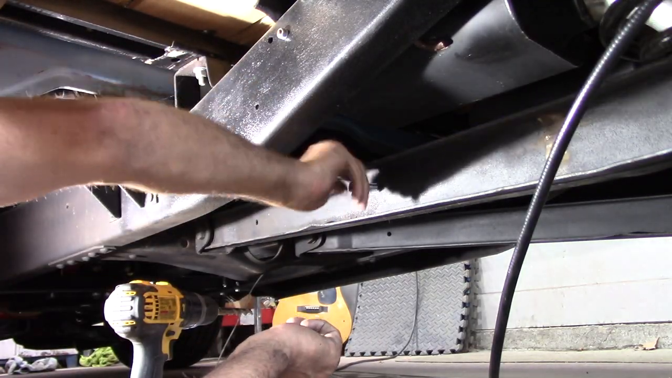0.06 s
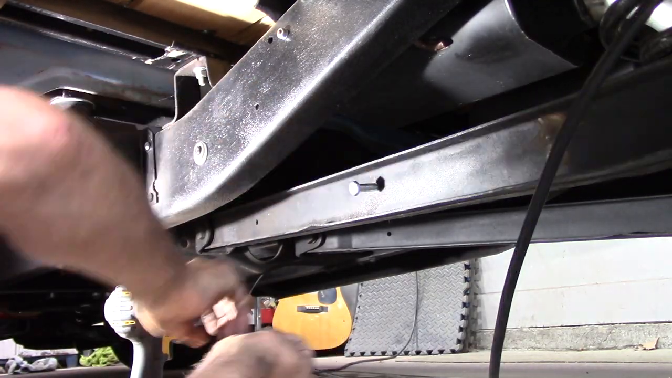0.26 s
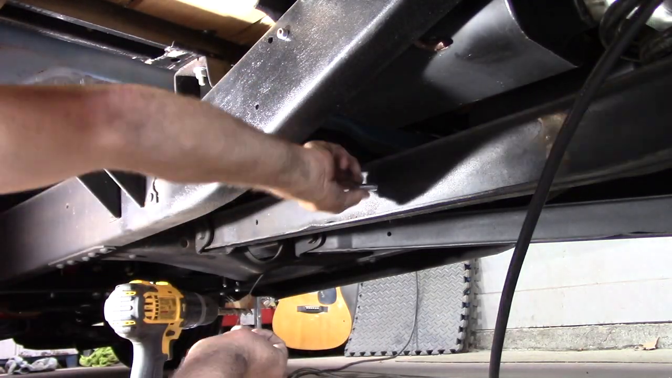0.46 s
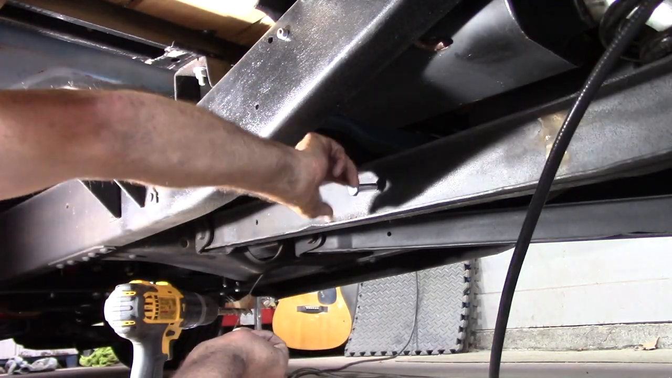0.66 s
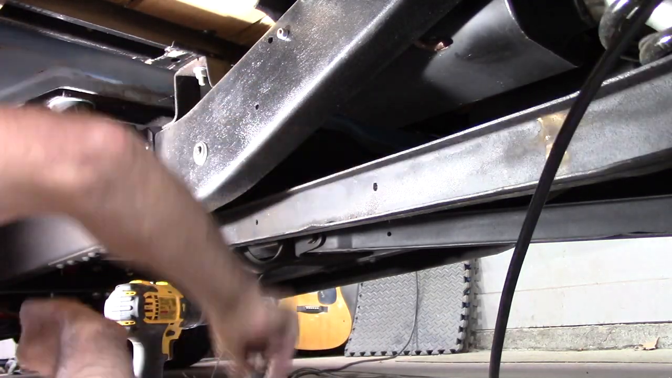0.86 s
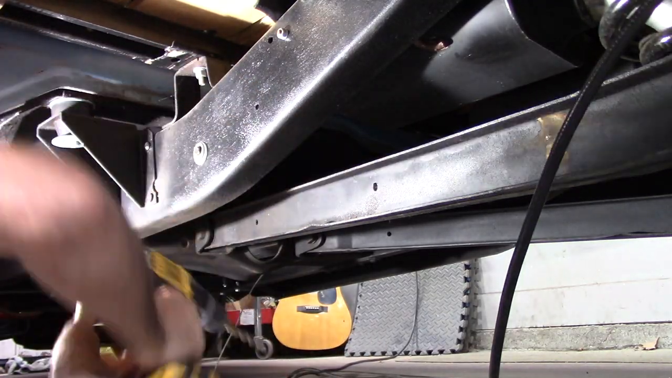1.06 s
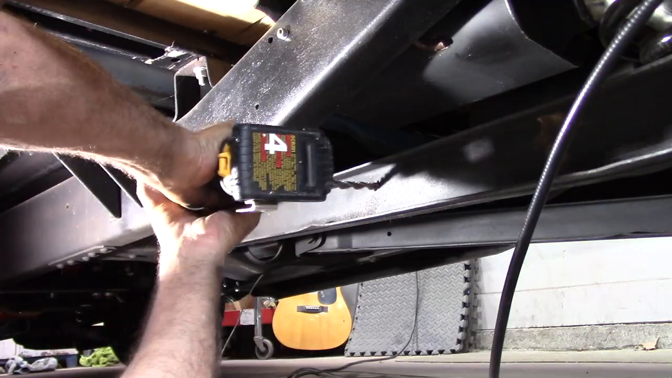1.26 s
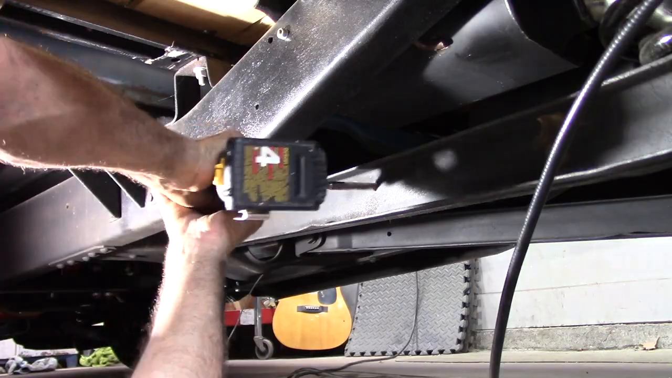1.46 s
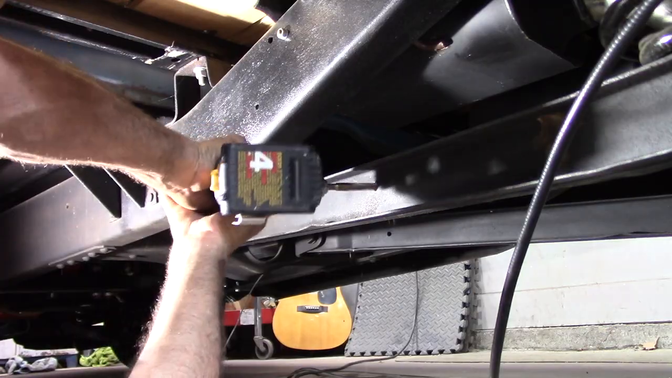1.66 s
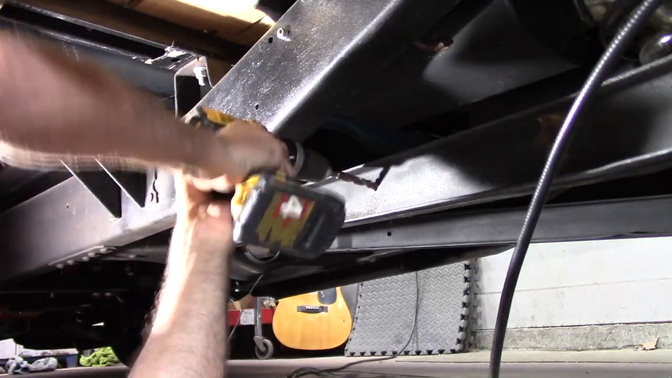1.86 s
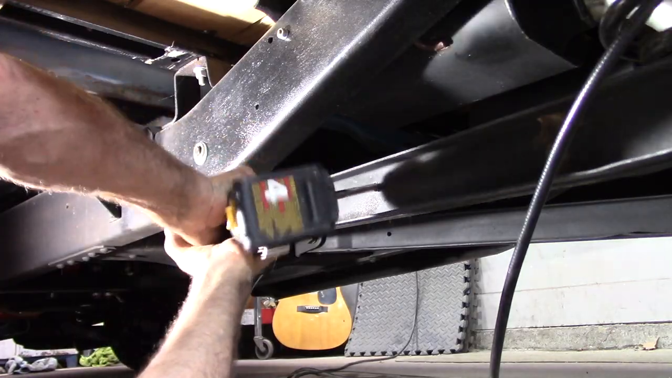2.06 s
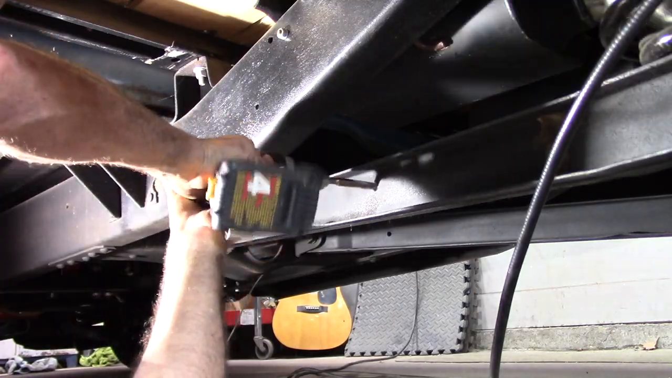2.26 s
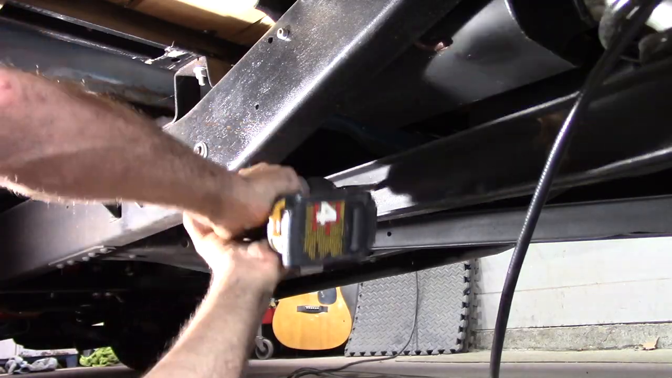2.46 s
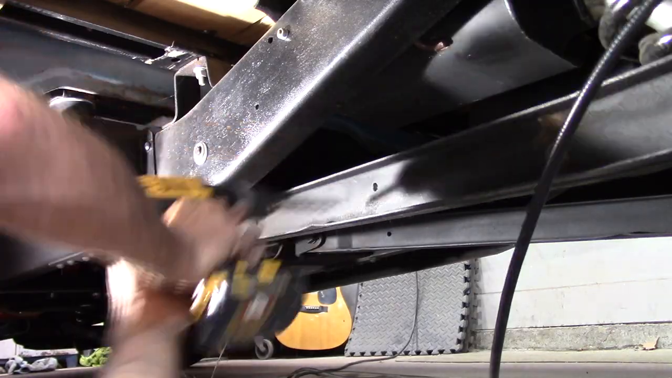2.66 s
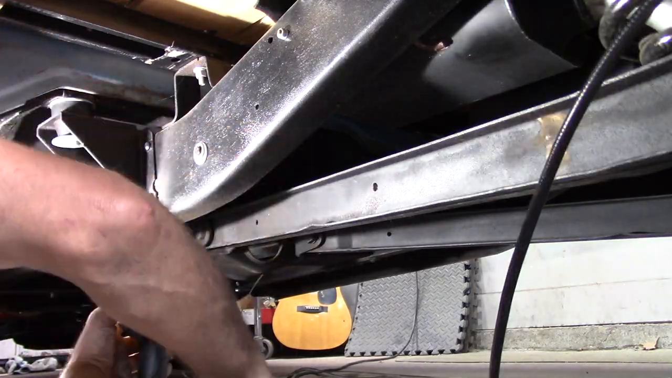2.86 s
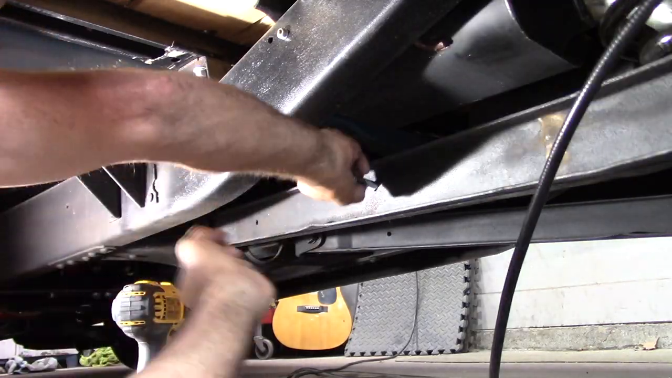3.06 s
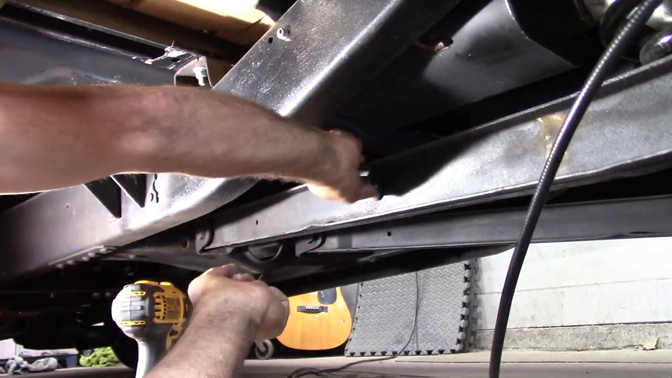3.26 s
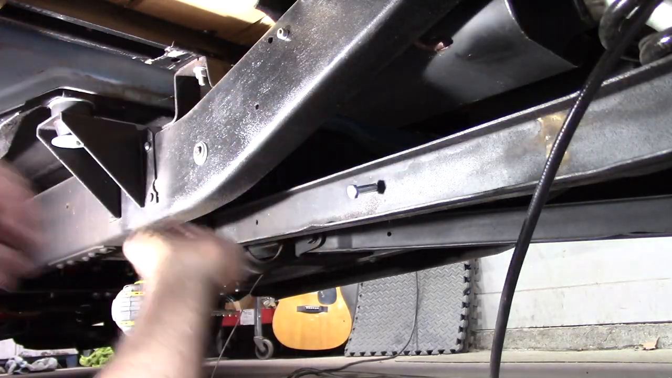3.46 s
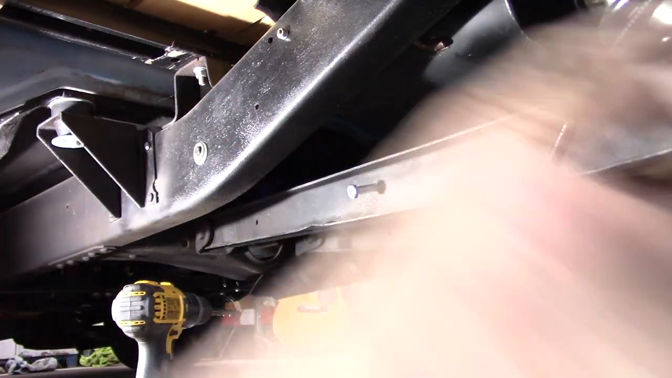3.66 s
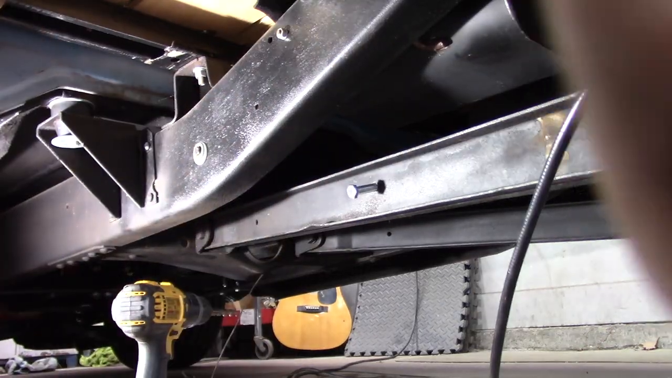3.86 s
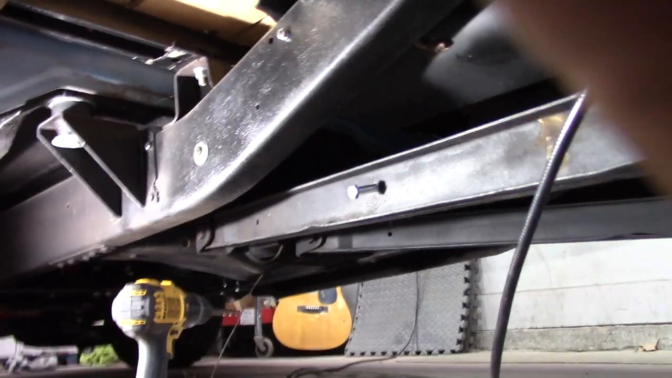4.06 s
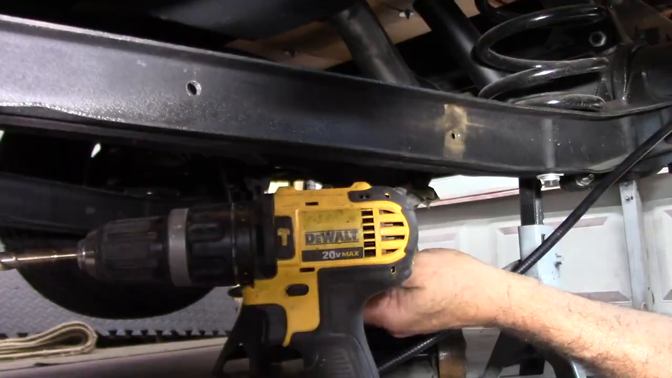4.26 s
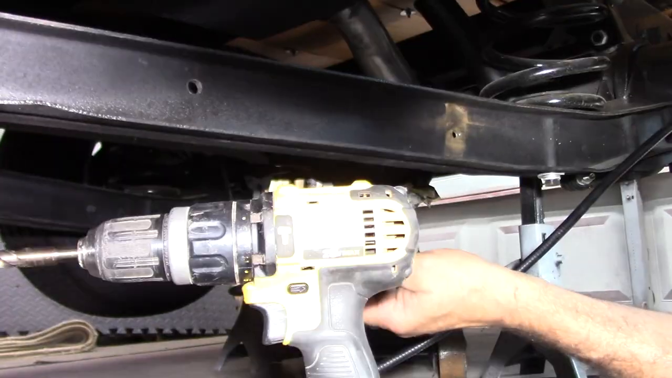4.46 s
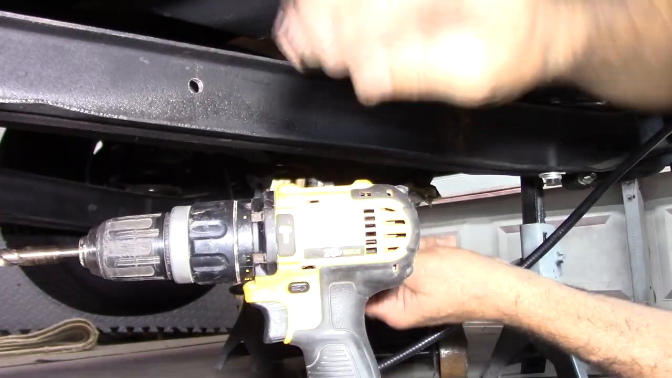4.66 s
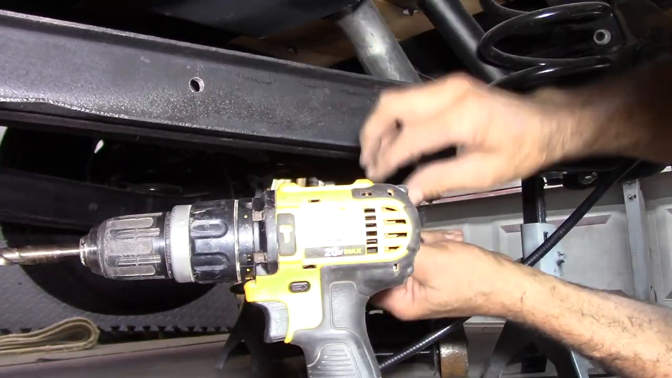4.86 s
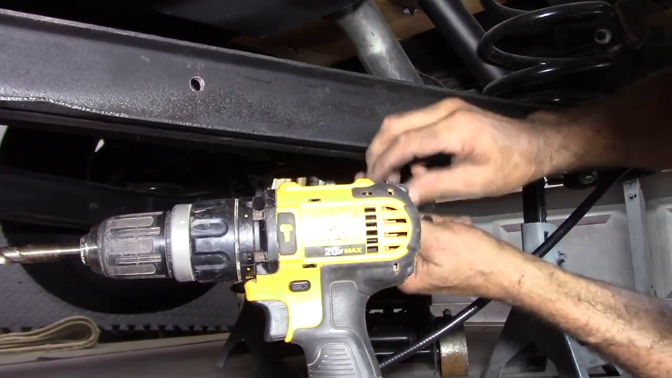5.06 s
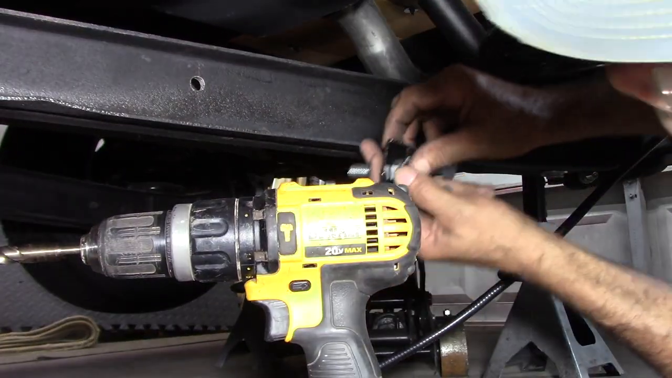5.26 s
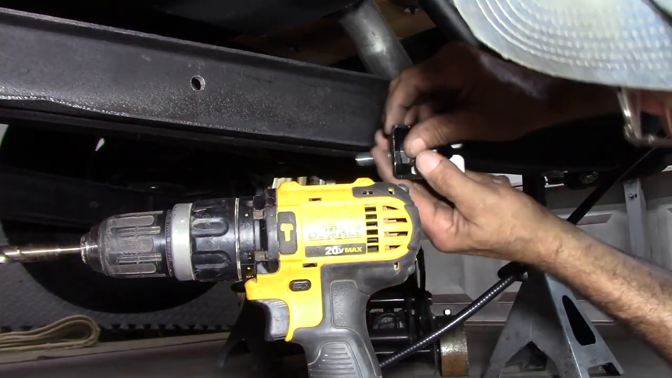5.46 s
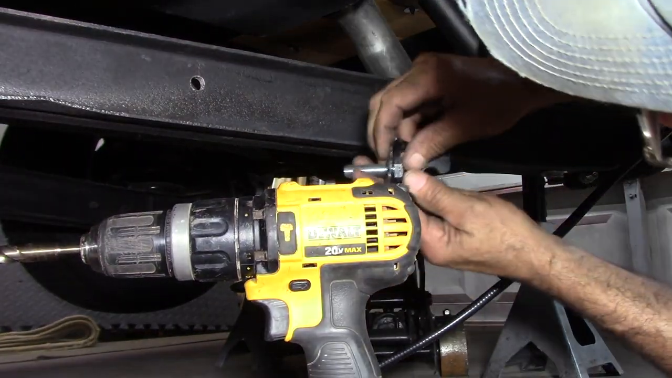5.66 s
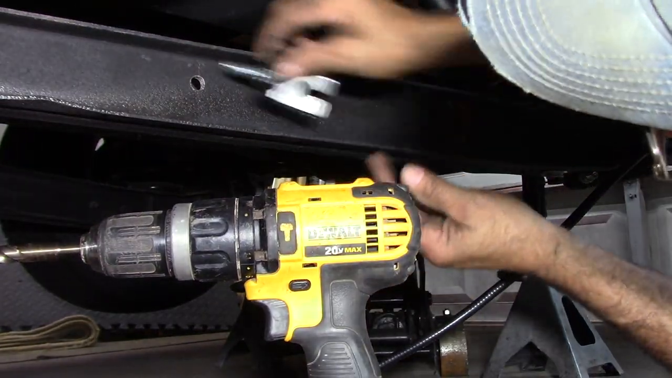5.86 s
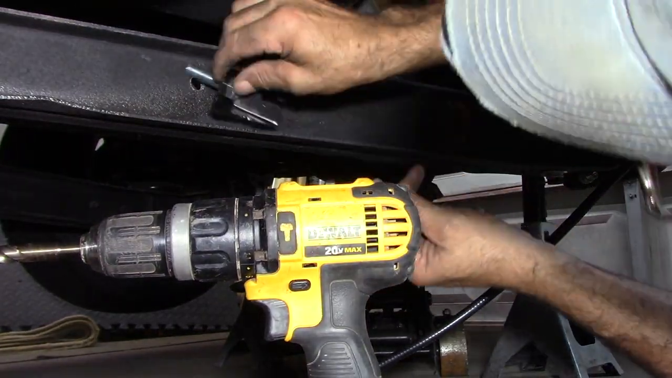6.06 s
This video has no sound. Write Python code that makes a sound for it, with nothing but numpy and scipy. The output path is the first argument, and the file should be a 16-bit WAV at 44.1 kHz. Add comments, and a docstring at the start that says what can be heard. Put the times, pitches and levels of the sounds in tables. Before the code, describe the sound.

In a garage, close and nearly central, fast-motion work on a steel rail: tiny bolt clinks and scrapes over a high fan rush, two drill knocks, then harsh bright drilling in two pushes with a high whine. The bolt rattles back in. At natural speed the fan drops to a low hum, small parts click, and a bracket clanks at the end.

```python
"""A garage, where someone works on a steel frame rail. First in fast motion, so that all is high and brief: a bolt is
tried in its hole, a cordless drill knocks against the rail and bores in two pushes, and the bolt scrapes back in, over
the rush of a fan. Then at natural speed: the fan hums low, small parts click and a steel bracket clanks on the rail.
Cutting, scrapes and air are coloured noise, clear rings are decaying sines, and the motor's whine is a gliding sine."""
import sys
import numpy as np
from scipy import signal
from scipy.fft import rfft, irfft, next_fast_len
from scipy.io import wavfile
from scipy.ndimage import uniform_filter1d, map_coordinates

SR = 44100
rng = np.random.default_rng(int(sys.argv[2]) if len(sys.argv) > 2 else 0)


def wrap_up_sound(samples):
    """Save the sound to the file named by the first command line argument, as 16-bit audio."""
    columns = np.atleast_2d(samples).T
    # keep every value between -1 and 1, then stretch to whole-number steps
    tamed = np.clip(columns, -1, 1)
    steps = np.round(tamed * 32767).astype(np.int16)
    wavfile.write(sys.argv[1], SR, steps)


N = 269892
TIME = np.arange(N) / SR
FAST_UNTIL_S = 4.309  # fast motion gives way to natural speed
TOP_HZ = 15850  # band limit

# The rail's low resonances. Each row: centre in Hz, width in Hz, gain in dB.
RAIL_LOW = [(832, 5.1, 3), (883, 5.4, 6), (990, 25, -14.5), (1178, 27, 1.5), (1410, 37, 2.5),
            (1537, 61, -0.5), (1610, 23, 0), (1780, 27, -1), (2340, 27, -0.5), (2780, 160, 2.5)]
# The rail's high resonances. Each row: centre in Hz, width in Hz, gain in dB.
RAIL_HIGH = [(3576, 300, 4.5), (4790, 33, 7.5), (5040, 30, 2), (5180, 99, 0), (5860, 32, 7),
             (6110, 60, -11), (6410, 110, 4), (6920, 87, 3), (7570, 80, -1), (7590, 100, 0.5),
             (8030, 130, 2), (8750, 150, 2.5), (9470, 130, 6), (9960, 150, 4.5), (10590, 120, 1),
             (11200, 91, 4.5), (11480, 120, -1), (12000, 180, 4), (14270, 120, 0.5), (14900, 160, 6),
             (15400, 150, -13)]
# Colour of a dull contact with the rail. Each row: frequency in Hz, relative level in dB per Hz.
THUD = [(180, -50.5), (300, -26.5), (824, -6), (1400, -7.5), (2080, -13.5), (2760, -13), (3050, -17.5),
        (3970, -14), (4310, -18.5), (4850, -13), (6530, -19), (8370, -24.5), (15700, -27.5)]


def amp(db):
    """Decibels to gain."""
    return 10 ** (np.asarray(db) / 20)


def unit(x):
    """Scale to rms 1."""
    return x / np.sqrt(np.mean(x ** 2) + 1e-20)


def curves(rows):
    """One value per sample for each column after the time."""
    s, *columns = np.transpose(rows)
    return [np.interp(TIME, s, column) for column in columns]


def wobble(rate):
    """A smooth random curve with this many knots a second."""
    knots = rng.standard_normal(int(N * rate / SR) + 4)
    return map_coordinates(knots, [TIME * rate])


def colour(points, hz):
    """Gain of (Hz, dB) points joined on a log frequency axis."""
    f, db = np.transpose(points)
    return amp(np.interp(np.log(hz + 1), np.log(f + 1), db))


def resonance(peaks, hz):
    """Gain of a set of resonances (centre Hz, width Hz, dB), their powers summed."""
    power = 0
    for centre, width, db in peaks:
        damping = (hz * width) ** 2
        power = power + amp(db) ** 2 * damping / ((centre * centre - hz * hz) ** 2 + damping)
    return np.sqrt(power)


def above(edge_hz, hz, order=8):
    """Gain of a high-pass."""
    return np.sqrt(1 - 1 / (1 + (hz / edge_hz) ** order))


def below(edge_hz, hz, order=8):
    """Gain of a low-pass."""
    return np.sqrt(1 / (1 + (hz / edge_hz) ** order))


def filtered(x, response):
    """Shape the spectrum of x by a gain that depends on frequency."""
    n = x.shape[-1]
    padded = next_fast_len(n + 4096)
    spectrum = rfft(x, padded) * response(np.fft.rfftfreq(padded, 1 / SR))
    return irfft(spectrum, padded)[..., :n]


def noise(response, size=N):
    """Coloured noise of rms 1."""
    return unit(filtered(rng.standard_normal(size), response))


def add(track, s, sound):
    """Mix a sound into a track at time s."""
    start = max(round(s * SR), 0)
    track[start:start + len(sound)] += sound[:max(N - start, 0)]


def contact(s, db, response, rise, t60):
    """A crowd of dense resonances swells to a crest at time s, then dies away, the treble faster."""
    start = max(round(s * SR) - SR // 8, 0)
    t = TIME[start:start + SR // 2] - s

    def shape(life):
        return np.exp(np.minimum(t, 0) / abs(rise) - np.log(1000) * np.maximum(t, 0) / life)

    crowd = noise(response, size=len(t))
    treble = filtered(crowd, lambda hz: above(7200, hz))
    track = np.zeros(N)
    add(track, start / SR, amp(db) * (shape(t60) * (crowd - treble) + shape(0.61 * t60) * treble))
    return track


def ring(s, db, modes):
    """Clear modes (Hz, dB, t60 s) struck at time s, at new strengths for each blow."""
    t = TIME[:SR // 2]
    hz, level_db, t60 = np.transpose(modes)[:, :, None]
    gain = amp(level_db + rng.normal(0, 1, level_db.shape))
    sines = np.sin(2 * np.pi * (hz * t + rng.random(hz.shape)))
    waves = gain * sines * np.exp(-np.log(1000) * t / t60)
    onset = 1 - np.exp(-t / 0.00059)
    track = np.zeros(N)
    add(track, s, amp(db) * onset * waves.sum(0) / np.linalg.norm(gain))
    return track


def tones(lines, drift):
    """Steady lines (Hz, rms dB) whose pitch wanders slightly."""
    total = 0
    for hz, db in lines:
        phase = 2 * np.pi * hz * np.cumsum(1 + drift * wobble(25)) / SR
        total = total + amp(db) * np.sqrt(2) * np.sin(phase)
    return total


def patchy(x, depth_db):
    """Resonances come and go as the tool shifts: a smooth random gain over frequency and time."""
    z = signal.stft(x, nperseg=1024)[2]
    field = rng.standard_normal(z.shape)
    for _ in range(2):
        field = uniform_filter1d(field, size=3, axis=0)
        field = uniform_filter1d(field, size=4, axis=1)
    return signal.istft(z * amp(depth_db * unit(field)), nperseg=1024)[1][:N]


def drill():
    """The flutes tear off chips and every fracture excites the rail; depth of cut drives all but the motor."""
    # How hard the bit cuts in the first push. Each row: time in seconds, cut in dB.
    first_push = [(1.41, -47), (1.436, -20), (1.45, -15), (1.792, -12), (1.82, -19.5), (1.856, -11.5),
                  (1.88, -16.5), (1.904, -34), (1.92, -29)]
    # How hard it cuts in the second push. Each row: time in seconds, cut in dB.
    second_push = [(1.92, -28), (1.928, -36), (1.972, -14), (2.058, -12.5), (2.156, -19), (2.17, -12),
                   (2.2, -18.5), (2.29, -11), (2.416, -13.5), (2.45, -9.5), (2.486, -18.5), (2.504, -13.5),
                   (2.578, -12.5), (2.618, -21.5), (2.67, -15.5), (2.7, -22.5), (2.716, -17.5),
                   (2.755, -40)]
    # Colour of the cutting noise. Each row: frequency in Hz, relative level in dB per Hz.
    cutting = [(150, -67), (250, -40), (347, -2), (458, -33.5), (536, -8), (683, -3), (855, -9),
               (982, -7.5), (1540, -16.5), (2180, -12), (3600, -12.5), (5090, -7), (7580, -11),
               (11300, -2.5), (15700, -6)]
    full_cut_db = -11.5  # a firm, steady cut
    stop_s, run_down_s = 2.77, 0.049  # the drill dies away just before it stops
    groan_start_db, groan_follows, groan_fade_db_per_s = -23, .25, 4  # less groan as the hole deepens
    # the rail booms once the bit is in, and fades as the motor slows; pressing harder damps it
    boom_from_s, boom_until_s = 1.66, 2.72
    boom_start_db, boom_damped, boom_fade_db_per_s = -30.5, 0.28, 4

    rows = np.vstack([first_push, second_push])
    cut_db, = curves(rows)
    start_s = rows[0, 0]
    load_db = cut_db - full_cut_db
    running = np.clip((TIME - start_s) * 100, 0, 1) * np.clip((stop_s - TIME) / run_down_s, 0, 1)

    grip = amp(0.77 * wobble(55) + 0.91 * wobble(260))  # the edge grabs and slips
    chips = patchy(rng.standard_normal(N), depth_db=2.0) * grip * amp(2 * rng.standard_normal(N))
    steel = lambda hz: colour(cutting, hz) * np.hypot(.65, resonance(RAIL_HIGH, hz))
    cut = unit(filtered(chips, lambda hz: steel(hz) * above(2770, hz) * below(7270, hz, order=16)))
    fizz_band = lambda hz: above(7200, hz, order=16) * below(TOP_HZ, hz, order=60)
    fizz = unit(filtered(chips, lambda hz: steel(hz) * fizz_band(hz)))

    groan_db = groan_start_db + groan_follows * load_db - groan_fade_db_per_s * (TIME - start_s)
    low_steel = lambda hz: colour(cutting, hz) * np.hypot(.25, resonance(RAIL_LOW, hz))
    groan = noise(lambda hz: low_steel(hz) * above(460, hz) * below(2070, hz))
    groan = unit(patchy(groan, depth_db=1.5)) * grip

    boom_times = [boom_from_s - .04, boom_from_s, boom_until_s, stop_s]
    boom_db = boom_start_db + np.interp(TIME, boom_times, [-13, 0, -0.5, -11.5])
    boom_db -= boom_damped * np.maximum(load_db, -15) + boom_fade_db_per_s * (TIME - boom_from_s)
    boom = noise(lambda hz: resonance([(545.7, 22.6, 0.0086)], hz) ** 2 + resonance([(348, 61, -12)], hz) ** 2)
    rumble = noise(lambda hz: colour([(20, -1), (80, -7), (300, -2.5), (600, -32.5)], hz))

    body = amp(groan_db) * groan + amp(boom_db + 2.2 * wobble(21.74)) * boom + amp(cut_db - 48.5) * rumble
    return running * (amp(cut_db - 4.0) * cut + amp(cut_db - 3.5) * fizz + body + motor())


def motor():
    """A slightly rough gear whine that grows with speed and swells while the motor speeds up."""
    # Speed of the motor. Each row: time in seconds, mean whine pitch in Hz.
    speed = [(1.42, 5300), (1.53, 10200), (1.59, 11700), (1.71, 8400), (1.945, 7700), (1.98, 11500),
             (2.12, 11200), (2.23, 11650), (2.68, 11350), (2.73, 7400)]
    whine_db, reference_hz, db_per_octave = -28.5, 11500, 11  # a slower motor whines more softly
    surge_db, surge_hz, surge_s = 6.5, 250, .05  # full surge after gaining this much pitch in this time
    pitch, = curves(speed)
    pitch_before = np.interp(TIME - surge_s, TIME, pitch)
    surge = np.clip((pitch - pitch_before) / surge_hz, 0, 1)
    level_db = whine_db + surge_db * surge + db_per_octave * np.log2(pitch / reference_hz)
    phase = 2 * np.pi * np.cumsum(pitch * (1 + .006 * wobble(500))) / SR
    return amp(level_db + 2.2 * wobble(45)) * np.sin(phase)


def bolt():
    """The bolt clinks in the hole, with clear modes, and its thread rasps over the edge."""
    # The bolt strikes the hole; the row at 2.821 s is instead a click as the drill bit leaves the hole. Each
    # row: time in seconds, strength in dB (each layer trims it), knock relative to it in dB, treble tilt in dB.
    clinks = [(0.0421, -21.5, -5, -11), (0.179, -22.5, -7, -16), (0.4953, -26.5, -17, -23),
              (0.8604, -2, -27, -5), (2.821, -20, -7.5, -6), (3.0796, -10, -18, -26),
              (3.1122, -8, -17.5, 0), (3.1334, -9.5, -11.5, -13), (3.272, -8.5, -20, -13),
              (3.3276, -8, -11.5, -12)]
    # The thread rasps along the edge. Each row: crest in seconds, level in dB, rise in seconds.
    scrapes = [(0.658, -19, 0.0096), (0.677, -33, .005), (.808, -24.5, 0.0047), (0.823, -17.5, 0.0079),
               (3.19, -15, 0.019), (3.285, -11, 0.0068), (3.345, -9.5, 0.0067)]
    # The bolt's modes. Each row: frequency in Hz, relative level in dB, t60 in seconds.
    bolt_modes = [(4540, 2, 0.11), (5140, -22, .14), (5760, 6.5, 0.09), (6260, 4.5, 0.08),
                  (7450, 5.5, 0.12), (8100, 2.5, 0.12), (10200, -10, 0.094), (15300, -7, .07)]
    # Colour of thread on edge. Each row: frequency in Hz, relative level in dB per Hz.
    rasp_colour = [(880, -31), (1500, 13), (1860, -2), (2090, -21), (2730, 1.5), (3010, -1), (3360, -7),
                   (4740, 0.5), (8450, -4), (11200, 1), (15700, -0.5)]
    clink_t60_s, scrape_t60_s = 0.12, 0.14

    out = np.zeros(N)
    rasp = lambda hz: colour(rasp_colour, hz) * np.hypot(.4, resonance(RAIL_HIGH, hz))
    for s, db, knock_db, fizz_db in clinks:
        tilt = [(3000, -11.5), (5000, -1.5), (7000, -5.5), (10000, fizz_db + 2)]
        out += contact(s, db - 5.5, lambda hz: rasp(hz) * colour(tilt, hz), 0.00033, clink_t60_s)
        out += ring(s, db - 10.5, bolt_modes)
        out += contact(s, db + knock_db - 0.5, lambda hz: colour(THUD, hz), 0.0017, clink_t60_s)
    for s, db, rise in scrapes:
        out += contact(s, db, rasp, rise, scrape_t60_s)
    return out * amp(0.61 * wobble(250))


def knocks():
    """Heavier contacts stir the rail's low resonances; the bit groans as it catches and snaps as it leaves the hole."""
    # The drill bit, later the bolt, bumps the rail. Each row: time in seconds, strength in dB
    # (each layer trims it), rise in seconds, t60 in seconds.
    bump_rows = [(1.2793, -15.5, 0.00063, 0.12), (1.287, -19, 0.0052, 0.14), (1.343, -12.5, 0.0058, 0.14),
                 (1.386, -30, 0.0078, 0.17), (3.284, -22, .008, 0.31), (3.35, -18.5, 0.0087, 0.2),
                 (3.399, -27.5, 0.022, 0.2)]
    # The bit catches in the hole and shakes the rail. Each row: crest in seconds, level in dB.
    catch_rows = [(1.49, -21.5), (1.625, -16), (1.87, -21.5), (2.28, -19.5), (2.445, -20.5)]
    # The rail's ring under a knock. Each row: frequency in Hz, relative level in dB, t60 in seconds.
    rail_modes = [(888, -4.5, 0.18), (1162, -3.5, 0.16), (1383, 0.5, 0.18), (1500, -9.5, .28),
                  (1660, -11.5, 0.22), (2540, -10.5, 0.16), (2790, -10, 0.16), (3440, -4, 0.043),
                  (3670, 2, 0.044), (5000, -9.5, 0.094), (6460, -9, 0.061)]
    catch_rise_s, catch_t60_s = .014, .25

    out = np.zeros(N)
    rail = lambda hz: colour(THUD, hz) * np.hypot(.6, resonance(RAIL_LOW, hz))
    for s, db, rise, t60 in bump_rows:
        out += contact(s, db - 0.5, rail, rise, t60) + ring(s, db + 4.0, rail_modes)
    groan = lambda hz: rail(hz) * np.hypot(.4, resonance([(863, 70, -0.96)], hz))
    for s, db in catch_rows:
        out += contact(s, db, groan, catch_rise_s, catch_t60_s)
    release = contact(2.822, -22.5, lambda hz: resonance([(2230, 830, 0)], hz) ** 2, 0.0012, 0.066)
    return out + release


def bracket():
    """Steel on steel: a bright, rough crash, clear modes, then a duller settling blow."""
    # The bracket hits the rail and settles. Each row: crest in seconds, level in dB, rise in seconds,
    # t60 in seconds, dullness in dB per octave (negative is brighter).
    clanks = [(6.003, -9.5, 0.00023, 0.3, -5), (6.052, -14, 0.011, 0.4, 3.5)]
    # Colour of the crash before dulling. Each row: frequency in Hz, relative level in dB per Hz.
    crash = [(150, -48), (250, -20), (641, -11.5), (801, -23.5), (888, -12), (1250, -9.5), (1340, -11),
             (1590, -6.5), (2240, -11), (2360, -13), (4370, -11), (9940, -39.5), (15000, -70)]
    # The bracket's modes. Each row: frequency in Hz, relative level in dB, t60 in seconds.
    bracket_modes = [(483, -14, 0.84), (1186, -14, .4), (1490, -8, 0.34), (1613, -2, 0.26),
                     (1990, -7, 0.64), (2180, -29, .5), (2380, -6, 0.31), (2660, -6, 0.45),
                     (3150, -25, 0.21), (3570, -7, 0.27), (4330, -10, 0.53), (4780, -7, 0.42),
                     (5270, -12, 0.53), (5400, 8, 0.035)]
    out = np.zeros(N)
    for s, db, rise, t60, dull_db in clanks:
        tilted = lambda hz: colour(crash, hz) * amp(-dull_db * np.log2(1 + hz / 400))
        out += contact(s, db, tilted, rise, t60)
    first_hit_s = clanks[0][0]
    return out * amp(0.91 * wobble(180)) + ring(first_hit_s, -4.0, bracket_modes)


def handling():
    """Dry ticks, clicks of small parts, brushing sleeves and a soft bump."""
    # Dry ticks of handling. Each row: time in seconds, level in dB.
    tick_rows = [(0.9578, -19), (0.9734, -18.5), (1.0914, -28), (3.8277, -27), (3.9953, -20), (4.0442, -26),
                 (4.058, -20), (4.2193, -17), (4.2798, -8.5)]
    # Colour of a tick. Each row: frequency in Hz, relative level in dB per Hz.
    tick_colour = [(2000, -36), (4000, -5), (5500, 7), (9000, 9.5), (16000, -1)]
    # Small parts click in the fingers. Each row: time in seconds, strength in dB (each layer trims it).
    click_rows = [(5.3067, -17.5), (5.6058, -15)]
    # Modes of the small parts. Each row: frequency in Hz, relative level in dB, t60 in seconds.
    part_modes = [(2560, 2, 0.087), (3040, -10.5, .06), (3420, -13, .06), (3790, -2, 0.043),
                  (3810, 6, 0.041), (4040, -3, 0.12), (6550, -12, 0.17), (10900, -11, 0.072)]
    tick_t60_s = 0.012

    out = brushing()
    for s, db in tick_rows:
        out += contact(s, db, lambda hz: colour(tick_colour, hz), 0.000061, tick_t60_s)
    snap = lambda hz: resonance([(3300, 1300, 0)], hz) ** 2
    for s, db in click_rows:
        out += ring(s, db - 14.5, part_modes) + contact(s, db - 15.5, snap, .0003, .04)
    bump = contact(5.935, -30, lambda hz: resonance([(97, 20, 0), (140, 45, 0)], hz) ** 2, 0.02, 0.3)
    return out + bump


def brushing():
    """Arms and sleeves brush past: each pass swells and fades, cut short by the change of speed."""
    # Each row: crest in seconds, level in dB, rise in seconds, fall in seconds.
    passes = [(4.05, -41.5, .2, .7), (4.9, -56, .1, .1), (5.8, -44.5, 0.15, 0.13)]
    swell = np.zeros(N)
    for s, db, rise, fall in passes:
        same_speed = (TIME < FAST_UNTIL_S) == (s < FAST_UNTIL_S)
        swell += amp(db) * np.exp(-np.maximum((s - TIME) / rise, (TIME - s) / fall)) * same_speed
    return swell * noise(lambda hz: colour([(1000, -7.5), (4000, 17.5), (10000, 5.5), (16000, -8)], hz))


def fan():
    """A fan's steady rush and tones fill the garage: high in fast motion, low at natural speed."""
    # The rush in fast motion. Each row: frequency in Hz, relative level in dB per Hz.
    fast_air = [(25, -54.5), (120, -50), (200, -27), (359, -14.5), (435, -15), (490, -9), (577, -10.5),
                (950, -3.5), (1080, -5), (1770, -1), (2200, -11.5), (2910, -9.5), (3240, -15.5),
                (6500, -20.5), (15700, -29.5)]
    # Resonances in that rush. Each row: centre in Hz, width in Hz, relative gain in dB.
    fast_peaks = [(497, 27, 2.5), (683, 4.5, 11), (953, 35, 3.5), (1840, 110, -13.5), (2630, 25, -14),
                  (2900, 110, -3.5)]
    # Tones in fast motion. Each row: frequency in Hz, level in dB.
    fast_tones = [(5539, -57.5), (6691, -55.5), (7617, -62.5)]
    # The rush at natural speed. Each row: frequency in Hz, relative level in dB per Hz.
    slow_air = [(30, -44), (70, -24), (100, -17.5), (130, -15), (165, -8), (200, -7), (420, -5.5),
                (640, -12), (950, -18), (1800, -22.5), (4000, -32), (7000, -39.5), (11000, -52.5),
                (15500, -70)]
    # Tones at natural speed. Each row: frequency in Hz, level in dB.
    slow_tones = [(123.8, -48), (376.8, -40), (441.4, -45), (516.8, -46.5), (1900, -54.5), (2482, -63)]
    fast_db, slow_db = -31, -32.5
    dip_s, dip_depth_db, dip_width_s = 2.78, 5.5, 0.11  # the rush dips briefly as the drill stops

    fast_rush = noise(lambda hz: colour(fast_air, hz) * np.hypot(.7, 1.04 * resonance(fast_peaks, hz)))
    dip_db = dip_depth_db * np.exp(-((TIME - dip_s) / dip_width_s) ** 2)
    fast = amp(fast_db - dip_db + 1.2 * wobble(33)) * fast_rush + tones(fast_tones, drift=0.00023)
    slow_rush = noise(lambda hz: colour(slow_air, hz))
    slow = amp(slow_db + 0.39 * wobble(13)) * slow_rush + tones(slow_tones, drift=0.0037)
    return np.where(TIME < FAST_UNTIL_S, fast, slow)


def diffuse_fan():
    """The fan's faint diffuse sound: noise of opposite sign at the two ears, so that they differ."""
    # In fast motion. Each row: frequency in Hz, relative level in dB per Hz.
    fast_diffuse = [(30, -19), (150, -17), (450, 2), (1500, -7.5), (2200, -32.5), (6000, -60)]
    # At natural speed. Each row: frequency in Hz, relative level in dB per Hz.
    slow_diffuse = [(30, -7), (450, 1), (1200, -17), (3500, -33), (8000, -50)]
    fast_db, slow_db = -68, -59
    fast = amp(fast_db) * noise(lambda hz: colour(fast_diffuse, hz))
    slow = amp(slow_db) * noise(lambda hz: colour(slow_diffuse, hz))
    side = np.where(TIME < FAST_UNTIL_S, fast, slow)
    return np.array([side, -side])


def spread(source, diffuse_db):
    """The same sound reaches both ears, with a trace of diffuse sound that differs between them."""
    direct = source()
    diffuse = amp(diffuse_db) * source()
    return np.array([direct + diffuse, direct - diffuse])


def scene():
    """All sources sit near the middle; only the bracket is a little to the left."""
    centre = drill() + bolt() + knocks() + fan()
    clank = spread(bracket, diffuse_db=-27) * amp([[.25], [-.25]])
    return centre + clank + spread(handling, diffuse_db=-28) + diffuse_fan()


def record(dry):
    """Peaks are rounded near full scale, then a steep low-pass closes the band."""
    rounded = dry / (1 + np.abs(dry) ** 6) ** (1 / 6)
    return filtered(rounded, lambda hz: below(TOP_HZ, hz, order=300))


dry = scene()
out = record(dry)
wrap_up_sound(out)
```